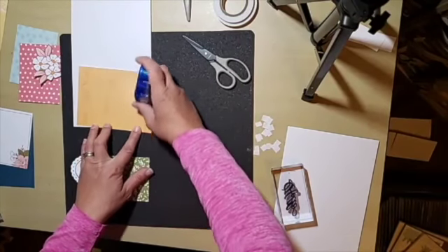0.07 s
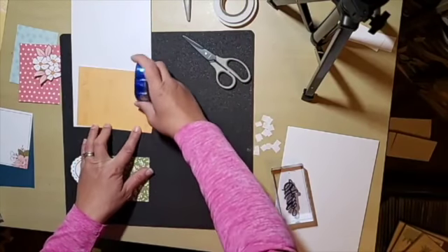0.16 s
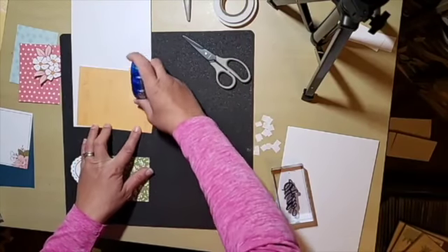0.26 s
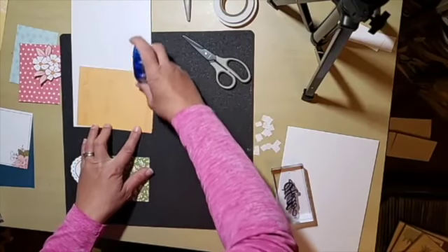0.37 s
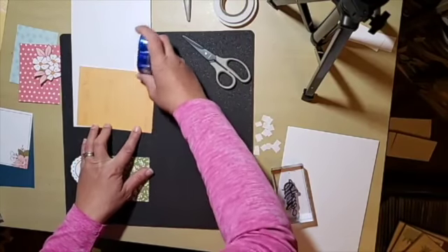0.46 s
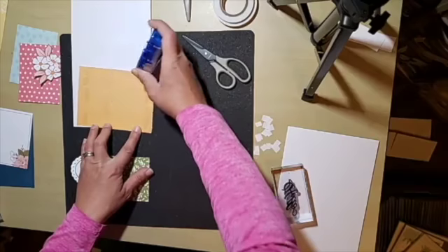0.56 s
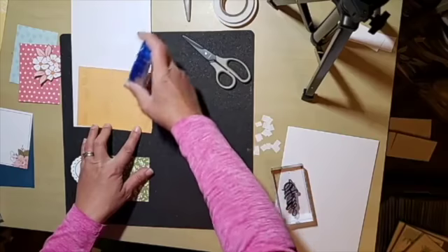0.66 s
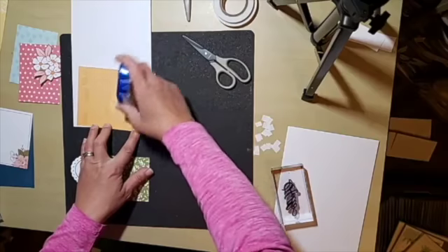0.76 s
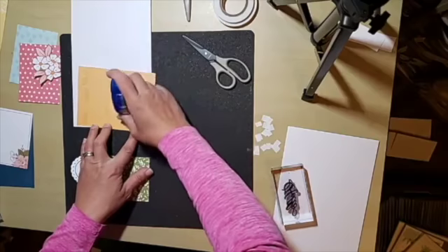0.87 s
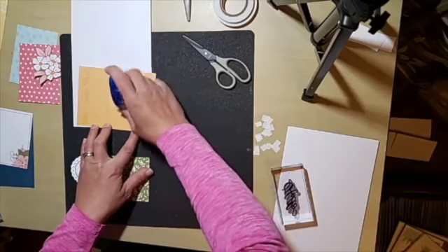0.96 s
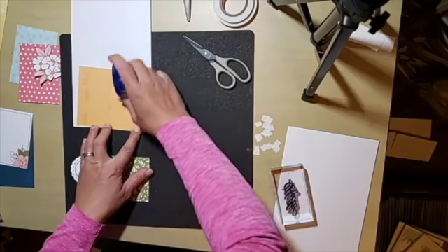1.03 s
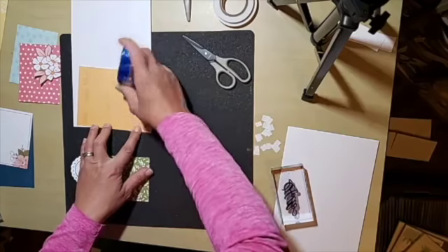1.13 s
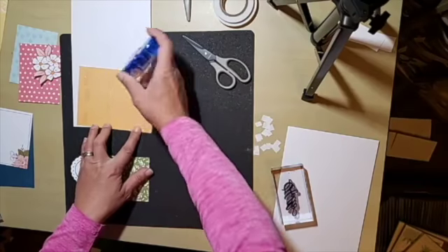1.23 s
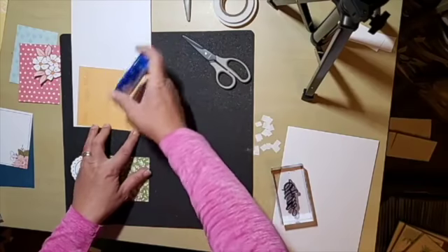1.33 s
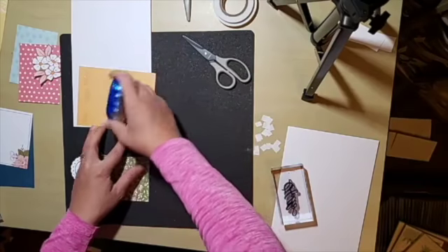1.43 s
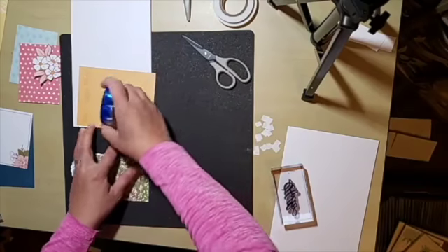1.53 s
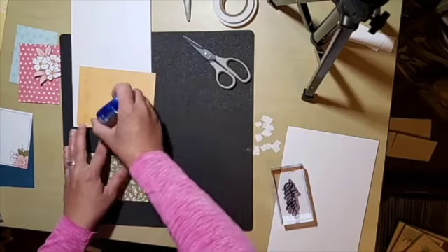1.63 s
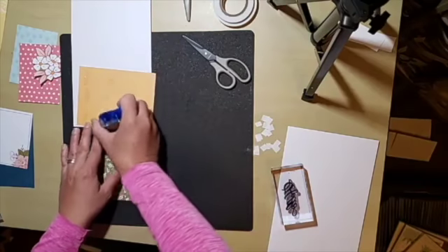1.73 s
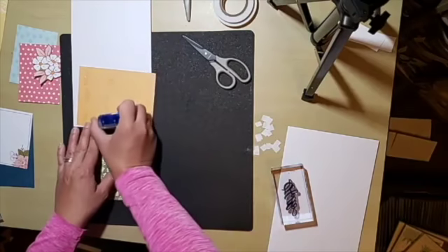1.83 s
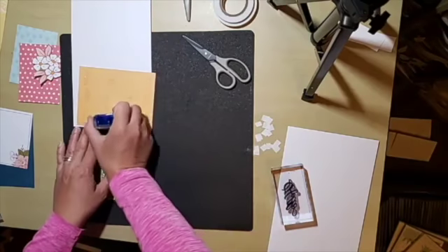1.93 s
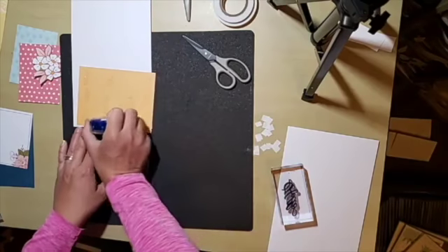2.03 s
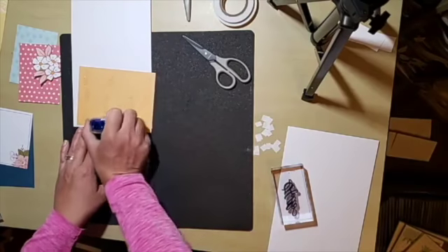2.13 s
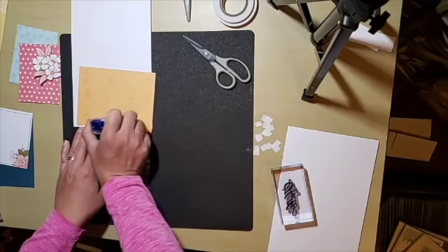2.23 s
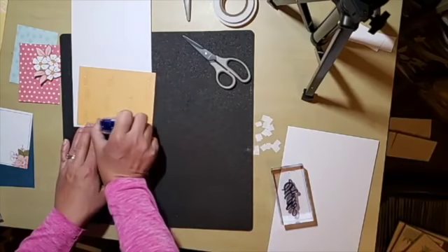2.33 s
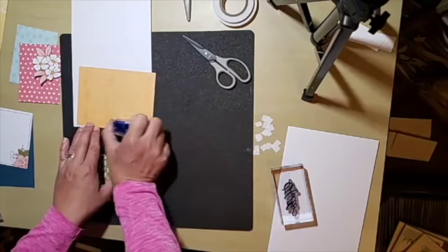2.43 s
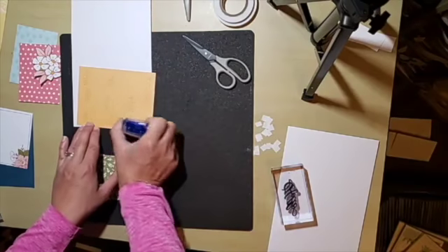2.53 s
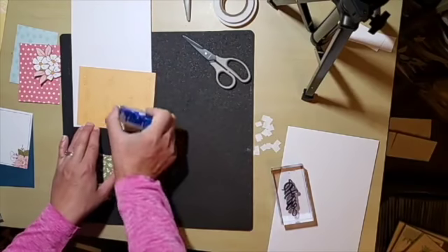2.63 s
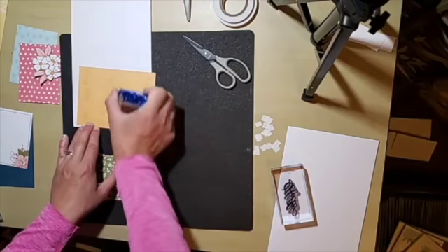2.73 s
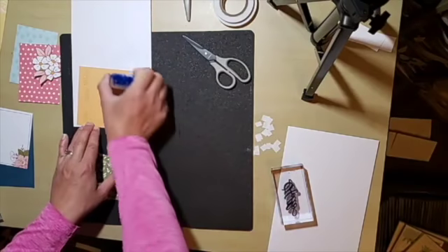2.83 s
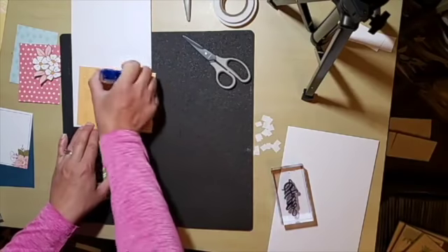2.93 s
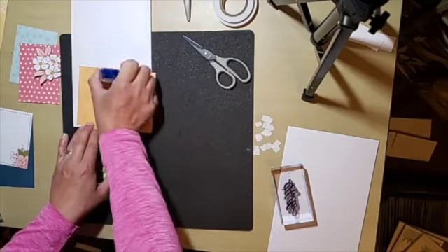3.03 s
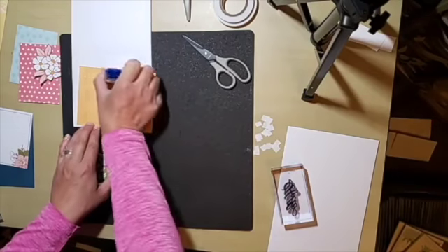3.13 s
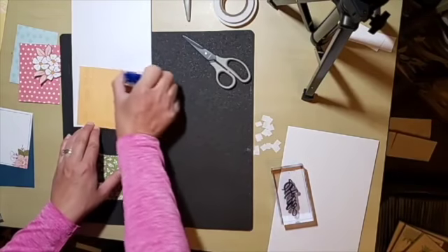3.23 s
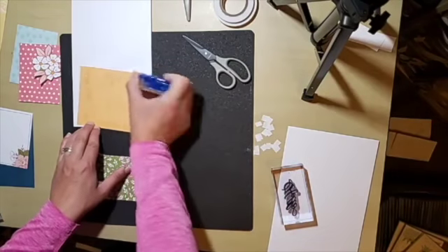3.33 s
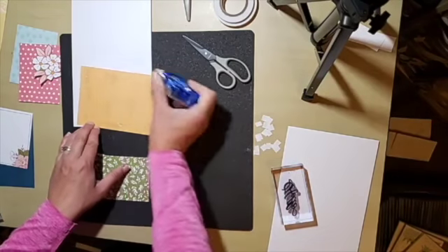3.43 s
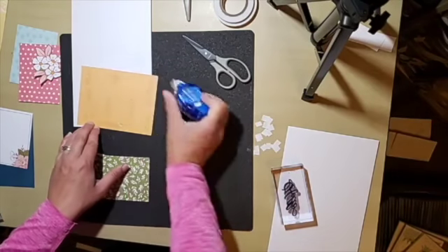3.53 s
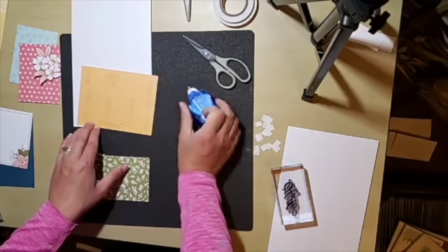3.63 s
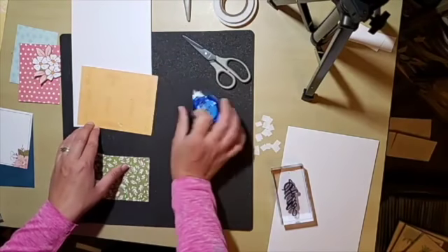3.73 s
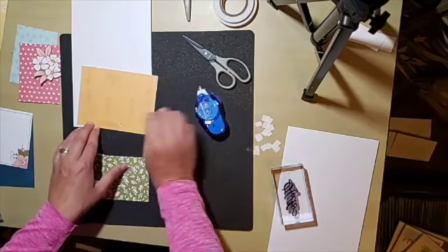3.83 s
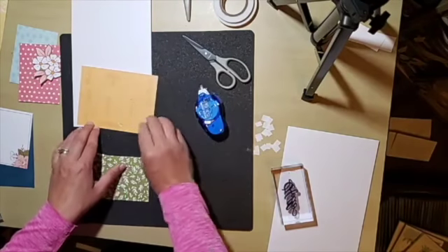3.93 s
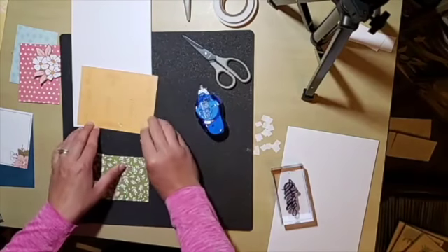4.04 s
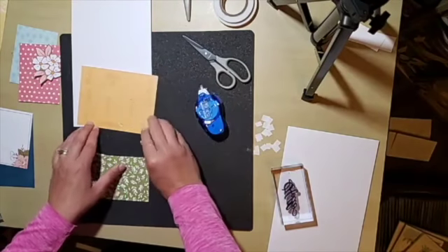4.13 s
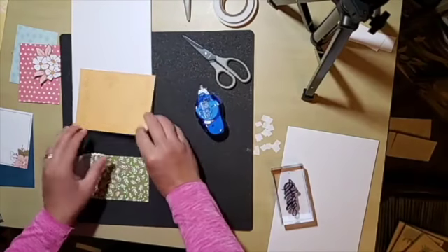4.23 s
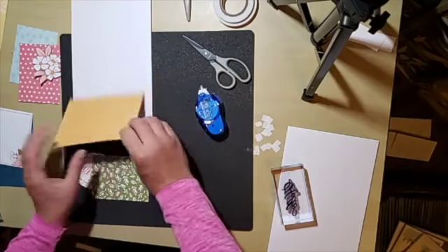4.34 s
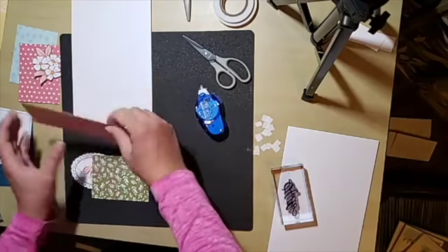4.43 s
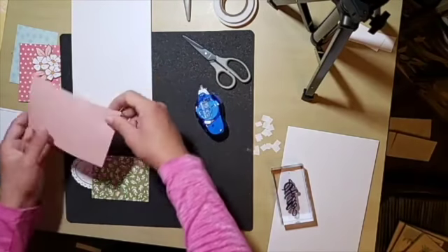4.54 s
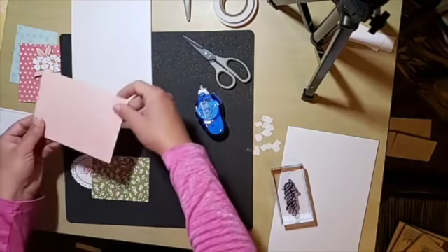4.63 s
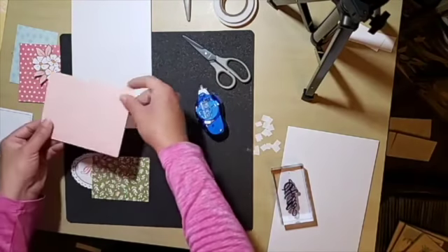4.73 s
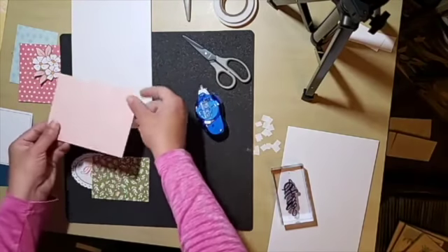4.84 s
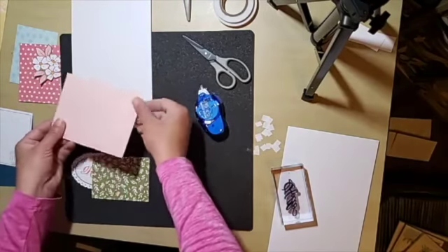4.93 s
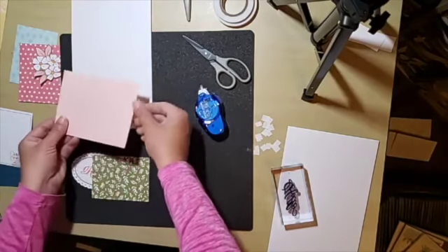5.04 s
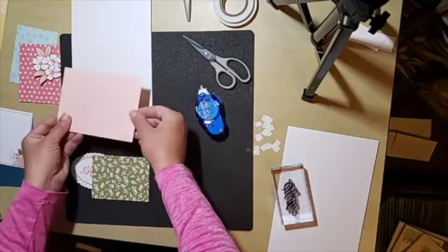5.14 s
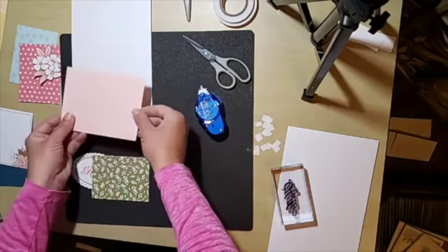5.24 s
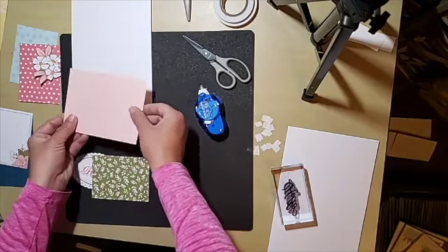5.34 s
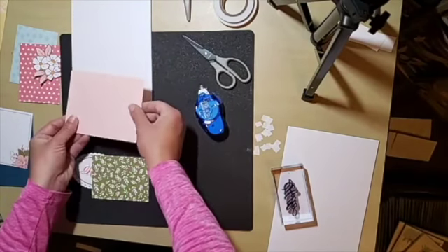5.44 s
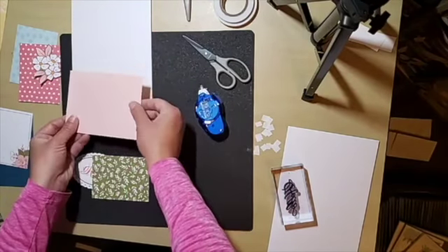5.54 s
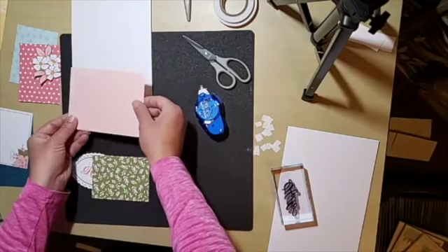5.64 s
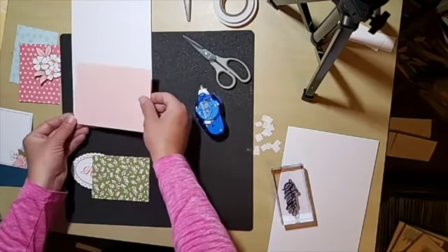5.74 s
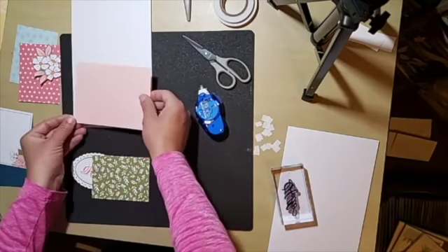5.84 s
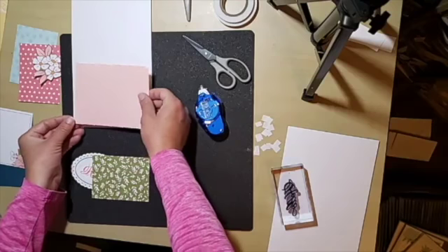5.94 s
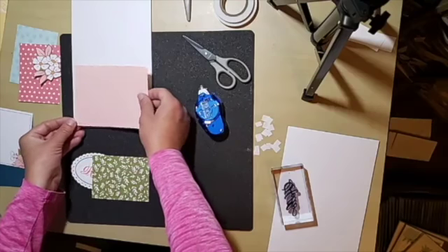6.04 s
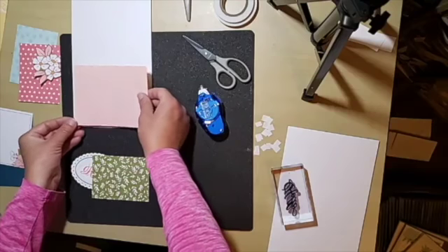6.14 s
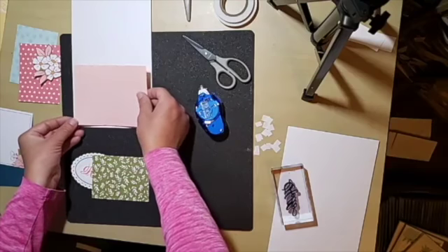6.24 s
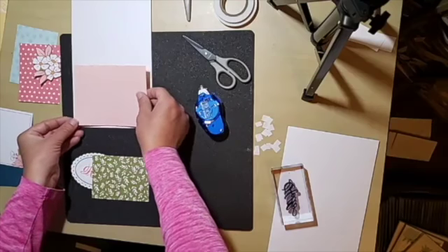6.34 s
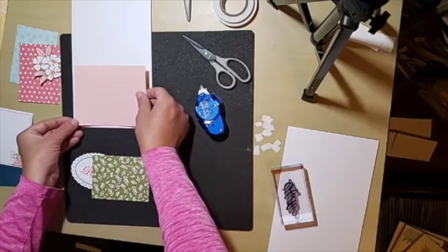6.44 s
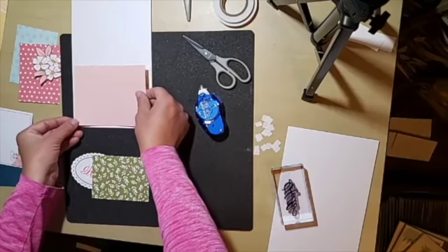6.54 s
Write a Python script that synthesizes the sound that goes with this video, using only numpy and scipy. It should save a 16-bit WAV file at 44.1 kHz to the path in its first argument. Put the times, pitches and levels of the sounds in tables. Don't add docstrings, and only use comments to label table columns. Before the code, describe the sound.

Close at a craft desk in a quiet furnished room, a handheld tape runner makes four short, dense rasps over card, separated by pauses. Its hollow plastic shell clicks and rattles between strokes, and the desk thuds softly. The tool is put down with the deepest thump, then a stiff card snaps, bends and rubs as it is lifted and positioned. Wide stereo pickup, with steady low hiss and rumble.

```python
import sys
import numpy as np
from scipy import signal
from scipy.fft import rfft, irfft, next_fast_len
from scipy.io import wavfile
from scipy.ndimage import uniform_filter1d

SR = 44100
rng = np.random.default_rng(int(sys.argv[2]) if len(sys.argv) > 2 else 0)


def gain_from_db(level_db):
    decades = np.asarray(level_db, float) / 20
    return 10 ** decades


def unload_wav(signal):
    wavfile.write(
        sys.argv[1],
        SR,
        np.round(np.clip(np.atleast_2d(signal).T, -1, 1) * 32767).astype(np.int16),
    )


N = 290619
N_FFT = next_fast_len(N)
GAIN_STEP = 32


def read(points):
    hz, value = np.transpose(points[:-1])
    return np.interp(np.log(np.fft.rfftfreq(N_FFT, 1 / SR) + 1), np.log(hz), value)


def filtered(x, gain):
    return irfft(rfft(x, N_FFT) * gain, N_FFT)[..., :N]


def colour(x, spectrum):
    return filtered(x, gain_from_db(read(spectrum)))


def bandpass(x, low_hz, high_hz):
    return signal.sosfilt(signal.butter(3, [low_hz, high_hz], "band", fs=SR, output="sos"), x)


def band(x, low_hz, high_hz):
    y = bandpass(x, low_hz, high_hz)
    return y / np.std(y)


def resonance(x, hz, width_hz):
    r = np.exp(-np.pi * width_hz / SR)
    zeros = (1 - r * r) / 2 * np.array([1, 0, -1])
    poles = [1, -2 * r * np.cos(2 * np.pi * hz / SR), r * r]
    return signal.lfilter(zeros, poles, x)


def ports(left_right_db):
    return gain_from_db(left_right_db * np.array([[.5], [-.5]]))


def grains(per_s, spread_db, clump_db, clump_s):
    knots = rng.standard_normal(int(N / SR / clump_s) + 9)
    clump = np.interp(np.arange(N) / SR / clump_s, np.arange(len(knots)), knots)
    size = gain_from_db(spread_db * np.minimum(rng.exponential(1, N), 4) + clump_db * clump)
    return size * rng.choice([-1, 1], N) * (rng.random(N) < per_s / SR)


def spread(shared, **how):
    both, left, right = grains(**how), grains(**how), grains(**how)
    return np.sqrt(shared) * both + np.sqrt(1 - shared) * np.array([left, right])


def three_bands(x, body_hz):
    return band(x, *body_hz), band(x, 2500, 9800), band(x, 9800, 18000) * ports(-2.3)


def swells(rows):
    start_s, rise_s, fall_s, level_db = np.array(rows)[:, :4, None].transpose(1, 0, 2)
    t = np.arange(0, N, GAIN_STEP) / SR - start_s
    rise = -t / np.maximum(rise_s, 1e-3)
    fall = t / np.maximum(fall_s, 1e-3)
    return gain_from_db(level_db - 20 * np.maximum(rise, fall))


def total(gains, db=0):
    power = np.sum((gains * gain_from_db(np.reshape(db, (-1, 1)))) ** 2, axis=0)
    return np.interp(np.arange(N), np.arange(0, N, GAIN_STEP), np.sqrt(power))


# pitch_hz, level_db [dB per Hz]
FLOOR = [(13, -11.5), (25, -10.5), (50, 1.5), (100, -10), (170, -12.5), (350, -14), (700, -17.5),
         (1500, -21), (2800, -17.5), (6000, -26), (8700, -33.5), (10500, -26.5), (13500, -17.5),
         (15900, -25.5), (20000, -60)]
# pitch_hz, likeness [0..1]
LIKENESS = [(60, 0.32), (300, 0.064), (1000, 0.026), (16000, 0.12), (20000, 0)]
# pitch_hz, level_db
HUM = [(120, -81.5)]
FLOOR_DB = -63.5


def room_noise():
    mid, side = colour(rng.standard_normal((2, N)), FLOOR)
    alike = np.clip(read(LIKENESS), 0, 1)
    mid = filtered(mid, np.sqrt(1 + alike))
    side = filtered(side, np.sqrt(1 - alike))
    out = np.array([mid + side, mid - side])
    t = np.arange(N) / SR
    hum = sum(gain_from_db(level_db) * np.sqrt(2) * np.sin(2 * np.pi * hz * t) for hz, level_db in HUM)
    return gain_from_db(FLOOR_DB) * out / np.std(out) + hum


ROOM_T60_S, ROOM_DB, RIGHT_LAG_S = .25, -11, .00014


def space(x):
    t = np.arange(16000) / SR
    tail = rng.standard_normal((2, 16000)) * gain_from_db(-60 * t / ROOM_T60_S) * (t > .001)
    tail = gain_from_db(ROOM_DB) * tail / np.linalg.norm(tail[0])
    lag = np.exp(-2j * np.pi * np.fft.rfftfreq(N_FFT, 1 / SR) * RIGHT_LAG_S)
    direct = np.array([x[0], filtered(x[1], lag)])
    return direct + signal.fftconvolve(x, tail, axes=1)[:, :N]


# start_s, peak_db
THUMPS = [(0.147, -43.5), (0.83, -45.5), (2.03, -44.5), (2.469, -51.5), (2.946, -35), (2.979, -38.5),
          (3.573, -49), (3.651, -22), (3.715, -26), (4.312, -40)]
# pitch_hz, level_db, t60_s
DESK = [(85.4, 2.5, 0.32), (110.7, -1.5, 0.28), (195.2, -9.5, 0.31), (310, -12.5, 0.16), (417, -16.5, 0.15),
        (156, -17, 0.24)]
# start_s [moment of the peak], rise_s [per 20 dB], fall_s [per 20 dB], level_db
LEANS = [(.25, 0.2, 0.56, -53), (.9, 0.1, 0.45, -54), (2.03, .5, 1.5, -58), (3.14, -0.1, -0.2, -43.5),
         (3.76, 0.24, 0.21, -39), (3.95, -7, 2.7, -72), (1.4, 0.5, 8.5, -66), (5.23, 0.5, 6, -74.5)]
SOFT_DULLS = 0.22


def desk():
    out = np.zeros(N)
    start_s, peak_db = np.array(THUMPS).T
    for hz, level_db, t60_s in DESK:
        dull_db = SOFT_DULLS * (peak_db - peak_db.max()) * np.log2(hz / DESK[0][0])
        uneven_db = rng.normal(0, 1.5, len(peak_db))
        push = np.full(N, 1e-18)
        push[(start_s * SR).astype(int)] = gain_from_db(peak_db + level_db - 5 + dull_db + uneven_db)
        r, w = gain_from_db(-60 / (t60_s * SR)), 2 * np.pi * hz / SR
        out += signal.lfilter([0, np.sin(w)], [1, -2 * r * np.cos(w), r * r], push)
    out = bandpass(out, 52, 480)
    out = np.convolve(out, np.hanning(90) / 45)[:N]
    rock = 1 + .15 * np.array([band(v, 12, 30) for v in rng.standard_normal((2, N))])
    both, left, right = [band(v, 39.7, 108.8) for v in rng.standard_normal((3, N))]
    stir = total(swells(LEANS), -2.8) * (both + 0.65 * np.array([left, right]))
    return (out * rock + stir) * ports(3.8)


# start_s [moment of the peak], rise_s [per 20 dB], fall_s [per 20 dB], level_db
GLIDES = [(5.76, .1, .5, -68.5), (5.89, -0.2, -1.4, -63)]
# pitch_hz, width_hz, level_db
GLIDE_TONES = [(1630, 220, -4), (2890, 86, -2)]


def glide():
    noise = rng.standard_normal((2, N))
    tones = sum(gain_from_db(level_db) * resonance(resonance(noise, hz, width_hz), hz, width_hz)
                for hz, width_hz, level_db in GLIDE_TONES)
    return total(swells(GLIDES)) * tones / np.std(tones)


# start_s [moment of the peak], rise_s [per 20 dB], fall_s [per 20 dB], level_db
BENDS = [(4.314, .008, .055, -30), (4.462, .006, .06, -43), (4.545, .006, .04, -46), (4.6, .06, .035, -42),
         (4.925, .03, .04, -56), (5.07, .02, .04, -62), (5.63, .03, .04, -57)]


def bends():
    creases = spread(.8, per_s=2500., spread_db=3., clump_db=2., clump_s=.008)
    flap = gain_from_db(-10.5) * band(creases, 120, 350)
    return total(swells(BENDS), -5.5) * (band(creases, 464, 880) + flap)


# start_s [moment of the peak], rise_s [per 20 dB], fall_s [per 20 dB], rub_db, fine_db
FINGERS = [(.5, 0.7, 0.12, -63, -16), (.55, 2, 0.16, -73, 2), (0.86, 0.01, 0.0063, -43, 8),
           (1.45, 0.46, 0.1, -66.5, 7.5), (1.75, -1, 5, -67, -6), (1.99, 0.55, 0.8, -60, -23),
           (2.17, 0.9, -10, -64.5, -26.5), (2.552, -3.3, 0.22, -56, -8), (3.32, -9, 1, -63, -5),
           (3.47, -1.5, 7, -80, -5), (3.58, 0.05, 0.12, -51.5, -8), (3.626, .09, 0.04, -47.5, 5.5),
           (3.67, 0.01, 0.0859, -46, -21), (3.72, 0.0368, 0.0072, -38, -12), (3.745, -7, 0.16, -62.5, -16)]
# start_s [moment of the peak], rise_s [per 20 dB], fall_s [per 20 dB], rub_db, flexing_db [re
SLIDES = [(4.21, -11, -4, -59, -21), (4.239, 0, -0.51, -45, -23), (4.313, 0.0128, -0.0074, -39, 8),
          (4.337, 0.0576, 0.0737, -41, -18), (4.47, 0.25, 0.63, -62, -7), (4.583, 0.11, .06, -43, -10),
          (4.66, 1, 0.73, -65, -28), (4.852, .27, 0.13, -56, -9.5), (4.912, -0.02, 0.0557, -48, -9),
          (4.928, -0.0345, -0.0021, -46.5, 16), (5.05, 0, 0.1, -74, 8), (5.256, -0.23, .07, -70, 1),
          (5.318, 0.3, .12, -79.5, 3), (5.532, -0.21, 0.15, -55, 0.5), (5.609, 0, 0.13, -55, 0),
          (5.86, 0, 0.1, -71.5, -0.5)]
# pitch_hz, level_db [dB per Hz]
RUB = [(410, -32), (700, -2), (1910, -11), (2300, -3), (3310, -9), (5380, -6), (8830, -17), (13200, -8),
       (15900, -15)]
FINGERS_BODY_DB, SLIDES_FINE_DB = -9, -5.5


def rubs():
    gains = swells(FINGERS + SLIDES)
    body_db = np.r_[np.full(len(FINGERS), FINGERS_BODY_DB), np.array(SLIDES)[:, 4]]
    fine_db = np.r_[np.array(FINGERS)[:, 4], np.full(len(SLIDES), SLIDES_FINE_DB)]
    slips = spread(.4, per_s=4000., spread_db=3.4, clump_db=3., clump_s=.007)
    body, middle, fine = three_bands(colour(slips, RUB), (1050, 2200))
    body = body + 2.5 * resonance(body, 1230, 140) + 4 * resonance(body, 1560, 160)
    out = total(gains) * middle
    out = out + total(gains, body_db - 6.5) * body
    out = out + total(gains, fine_db + 2) * fine
    return gain_from_db(1.5) * out


def knocks(events, width, ring_s, crack_s, rise_s):
    out, t = np.zeros((2, N + 9000)), np.arange(6000) / SR
    for start_s, peak_db, hz, crack_db, left_right_db in events:
        contact, noise = rng.standard_normal((2, 6000))
        ring = contact * gain_from_db(-60 * t / ring_s)
        ring = resonance(resonance(ring, hz, width * hz), hz, 3 * width * hz)
        low = noise * gain_from_db(-90 * t / ring_s)
        ring = ring + .25 * resonance(resonance(low, .8 * hz, .4 * hz), .8 * hz, .4 * hz)
        crack = band(noise, 2000, 7500) + .6 * band(contact, 10500, 16500)
        rattle = gain_from_db(-17 - 60 * t / .22)
        crack = crack * gain_from_db(max(crack_db, -16)) * (gain_from_db(-60 * t / crack_s) + rattle)
        hit = (ring / np.abs(ring).max() + crack) * (1 - np.exp(-t / rise_s))
        at = max(round((start_s - .0012) * SR), 0)
        out[:, at:at + 6000] += gain_from_db(peak_db) * ports(left_right_db) * hit
    return out[:, :N]


# start_s, peak_db, pitch_hz, crack_db [re peak], left_right_db
SNAPS = [(4.311, -24, 840, -2, 6.5), (4.351, -33, 1030, -11, 4), (4.459, -39, 746, -9, 6),
         (4.54, -38.5, 710, 0, 11.5), (4.597, -39, 487, -6, 6), (4.92, -27, 1170, -19.5, 5.5),
         (5.06, -48.5, 1260, -9, 9), (5.237, -60, 1175, 0, 11.5), (5.312, -56, 1450, -25, 15),
         (5.533, -44, 1260, -16, 9), (5.624, -39.5, 1360, -5.5, 3), (4.581, -46, 620, -5, -8),
         (4.85, -45, 1300, -1, 8)]


def card_snaps():
    return knocks(SNAPS, width=0.33, ring_s=0.088, crack_s=0.021, rise_s=0.0031)


# start_s, peak_db, pitch_hz, crack_db [re peak], left_right_db
TICKS = [(0.502, -44.5, 2480, 1, 11.5), (0.8625, -43.5, 1720, 8, 7), (1.5721, -53, 1810, -1, 4),
         (1.5919, -35, 2190, -17.5, 6.5), (1.802, -35, 1790, -6, 6.5), (1.8555, -47, 1600, -1.5, 15),
         (1.8713, -50.5, 2270, 5, 15), (1.923, -34, 2080, -12.5, 8.5), (2.0338, -54, 1410, 7.5, 10),
         (2.0684, -37, 1600, -24, 4), (2.115, -41.5, 1750, -23, -2), (2.138, -45, 1760, -14, 9.5),
         (2.1763, -32, 2480, 5.5, 6), (2.2035, -16, 2230, -8, 3), (2.5846, -35, 1510, -18, 0.5),
         (2.6386, -27, 2060, -7, 6), (3.0514, -80, 2670, -3, -6), (3.3283, -25.5, 2170, -18, 3),
         (3.5504, -47.5, 2140, -14, -8), (3.5738, -31, 2520, -17.5, 9.5), (3.651, -27, 1560, 1.5, 11),
         (3.716, -43, 1780, 6, -5)]


def shell_ticks():
    return knocks(TICKS, width=0.16, ring_s=0.067, crack_s=0.034, rise_s=.0012)


# start_s, length_s, rasp_db, swell_db [over the stroke], speedup_s
STROKES = [(-.25, .21, -33, 2, .02), (0.21, 0.19, -20.5, -11, 0.045), (0.874, 0.15, -31, -1, 0.015),
           (2.196, .25, -33, 2, 0.0015), (3.039, 0.19, -30, 1.5, 0.024)]
BITE_S, START_DB = 0.013, -24
LIFT_DB_PER_S, SPIN_DB, SPIN_DB_PER_S = 386, -19.5, 153
BODY_DB, BODY_START_DB, BODY_GROW_S = -7.5, -5, 0.062
FINE_DB, FINE_LIFT_DB_PER_S = 0.5, 68.5


def strokes():
    start_s, length_s, rasp_db, swell_db, speedup_s = np.array(STROKES).T[:, :, None]
    t = np.arange(0, N, GAIN_STEP) / SR - start_s
    since, after = np.maximum(t, 0), np.maximum(t - length_s, 0)
    bite = np.clip(t / BITE_S, 0, 1)
    lift = gain_from_db(-LIFT_DB_PER_S * after) + gain_from_db(SPIN_DB - SPIN_DB_PER_S * after)
    speed_db = START_DB * np.exp(-since / np.maximum(speedup_s, 1e-3))
    gain = bite * lift * gain_from_db(rasp_db + speed_db + swell_db * np.minimum(since / length_s, 1))
    body = gain * gain_from_db(BODY_DB + BODY_START_DB * np.exp(-since / BODY_GROW_S))
    fine = gain * gain_from_db(FINE_DB - FINE_LIFT_DB_PER_S * after)
    return total(gain), total(body), total(fine)


# pitch_hz, level_db [dB per Hz]
RASP = [(180, -53), (300, -23.5), (593, -30), (1110, -15), (1580, -4.5), (2030, -10), (2240, -4.5),
        (2780, -8.5), (4140, -3), (6930, -3), (8600, -13), (13500, -2), (15900, -3)]
# pitch_hz, width_hz, level_db
SHELL = [(1115, 42, 14), (1703, 490, 4.5), (2270, 36, 12), (2864, 550, 4.5), (3340, 290, 5), (4030, 690, 1),
         (5510, 100, -6), (6040, 280, -9), (9260, 860, -14), (802, 100, 6.5), (13000, 560, -21.5)]


def rasp():
    level, body_level, fine_level = strokes()
    pops = spread(.4, per_s=7000., spread_db=3.1, clump_db=2.2, clump_s=.004)
    pops = colour(pops, RASP)
    ringing = pops
    knots = np.arange(0, N + 3000, 3000)
    for hz, width_hz, level_db in SHELL:
        grip = np.interp(np.arange(N), knots, .9 + .6 * rng.standard_normal(len(knots)))
        ringing = ringing + grip * gain_from_db(level_db) * resonance(pops, hz, width_hz)
    body, middle, fine = three_bands(ringing, (200, 3000))
    return gain_from_db(4.2) * level * middle + gain_from_db(5.2) * (body_level * body + fine_level * fine)


def scene():
    near = (rasp() + rubs() + bends()) * ports(2.2)
    near = near + shell_ticks() + card_snaps()
    return space(near) + desk() + room_noise() + glide()


def band_limit(x):
    return signal.sosfilt(signal.butter(12, 16960, fs=SR, output="sos"), x)


# start_s, end_s
TOP_LOST = [(1.266, 1.47), (2.275, 2.325), (4.255, 4.462), (5.27, 5.31)]


def record(dry):
    t = np.arange(N) / SR
    lost = sum((t > start_s) * (t < end_s) for start_s, end_s in TOP_LOST) * 1.
    lost = uniform_filter1d(lost, size=200)
    dry = signal.sosfilt(signal.cheby2(12, 60, 16350, fs=SR, output="sos"), dry)
    dull = signal.sosfiltfilt(signal.cheby2(8, 40, 10900, fs=SR, output="sos"), dry)
    return band_limit(dry + lost * (dull - dry))


dry = scene()
out = record(dry)
unload_wav(out)
```